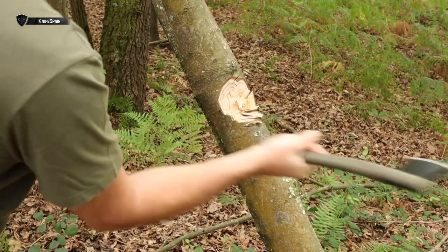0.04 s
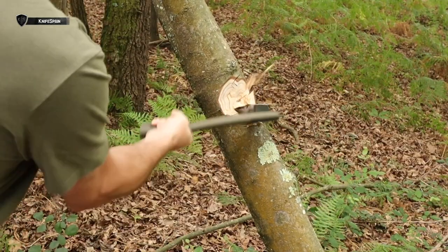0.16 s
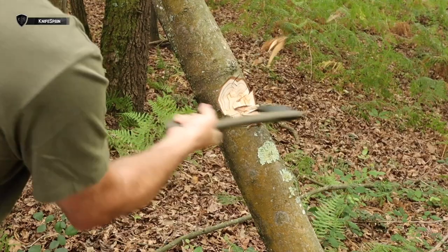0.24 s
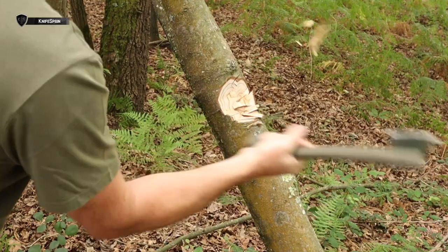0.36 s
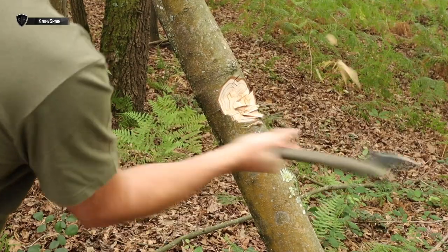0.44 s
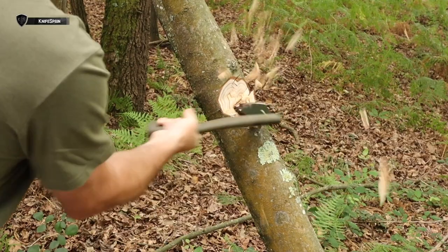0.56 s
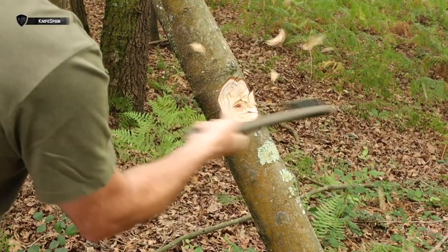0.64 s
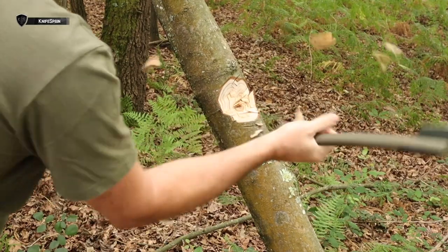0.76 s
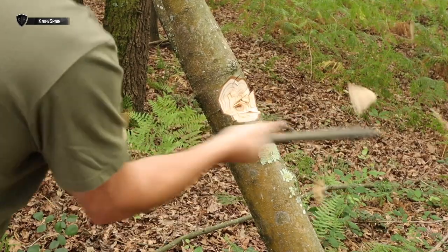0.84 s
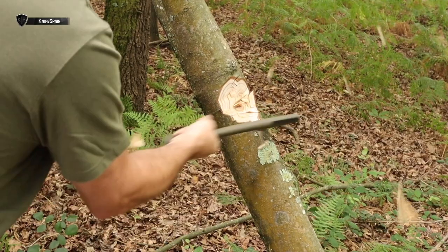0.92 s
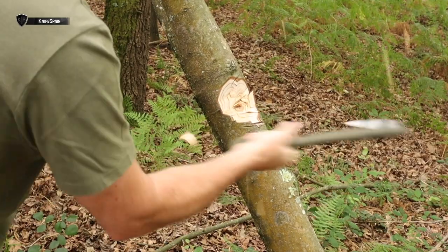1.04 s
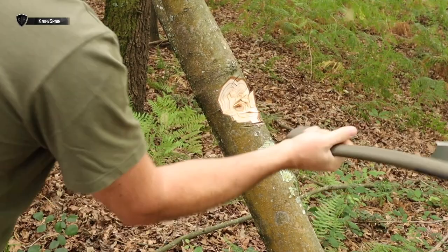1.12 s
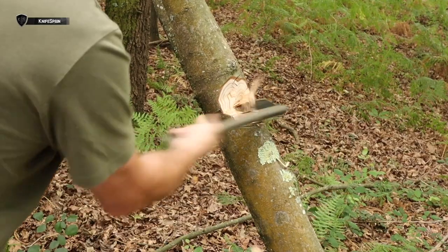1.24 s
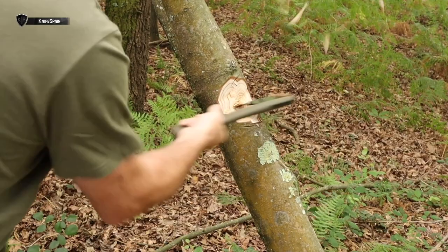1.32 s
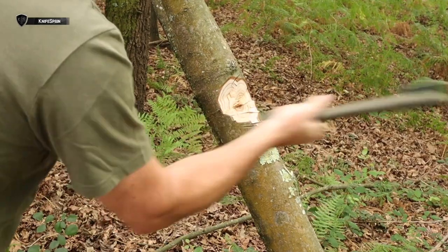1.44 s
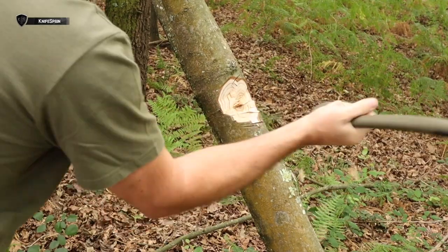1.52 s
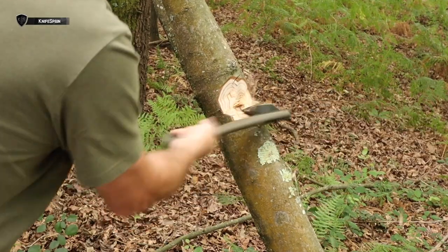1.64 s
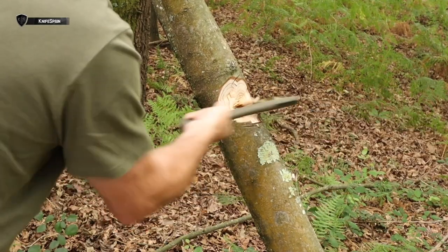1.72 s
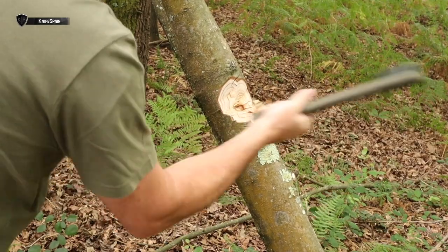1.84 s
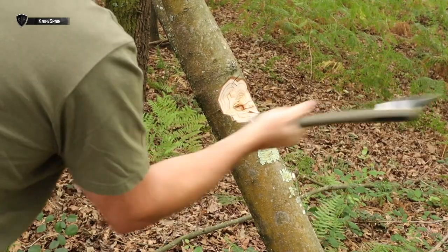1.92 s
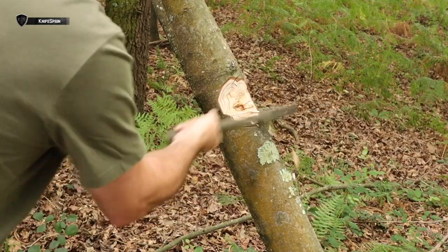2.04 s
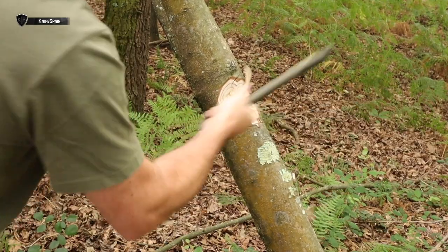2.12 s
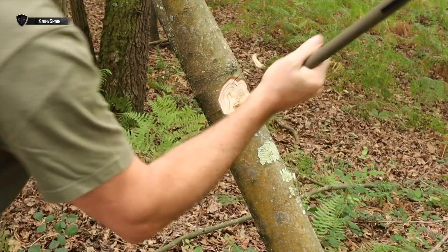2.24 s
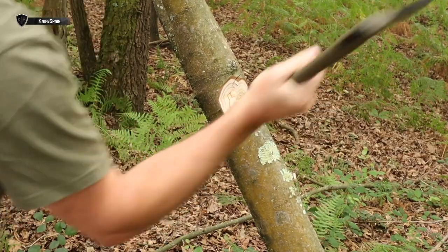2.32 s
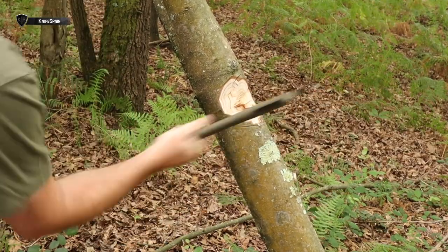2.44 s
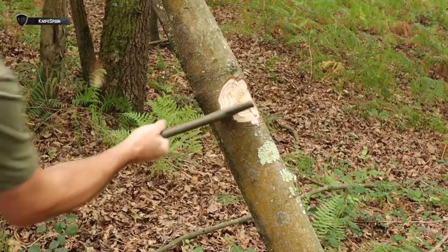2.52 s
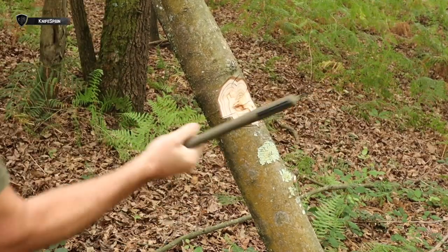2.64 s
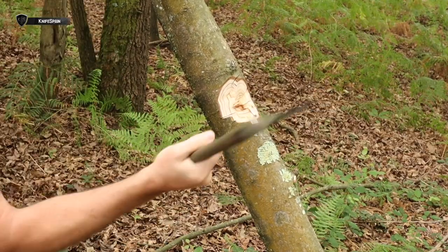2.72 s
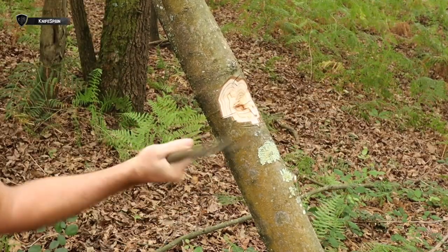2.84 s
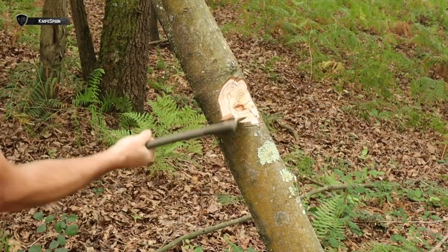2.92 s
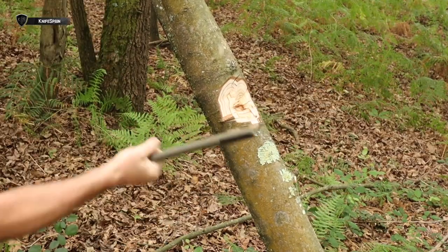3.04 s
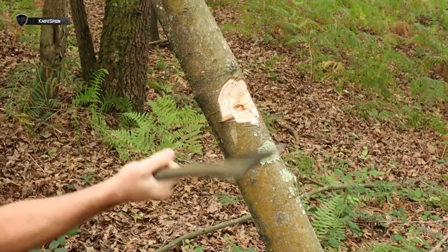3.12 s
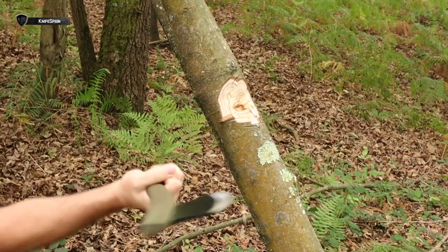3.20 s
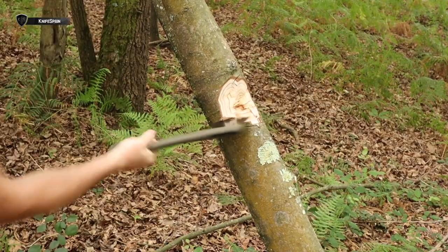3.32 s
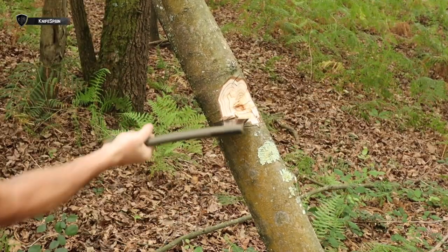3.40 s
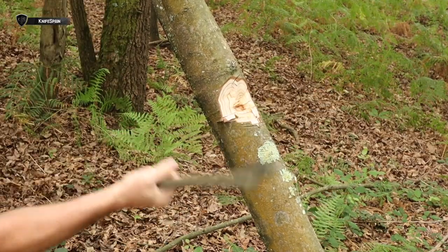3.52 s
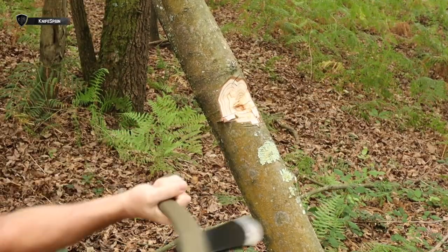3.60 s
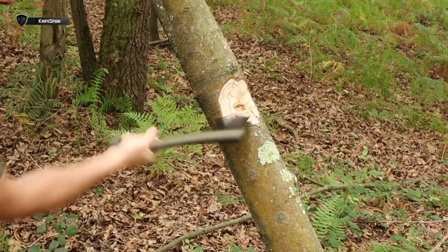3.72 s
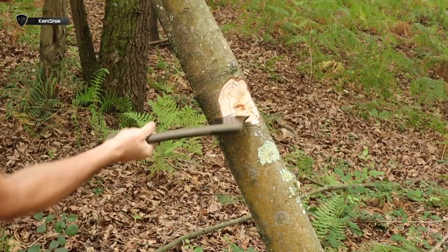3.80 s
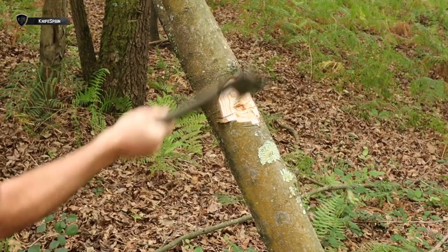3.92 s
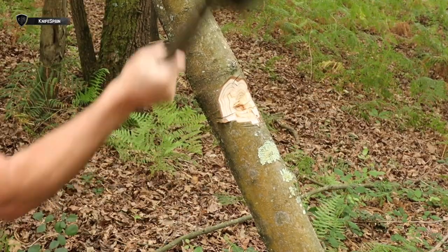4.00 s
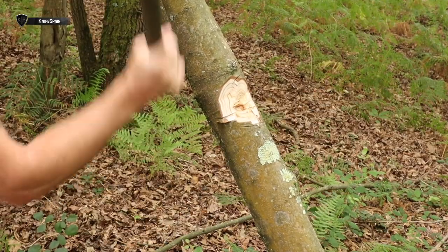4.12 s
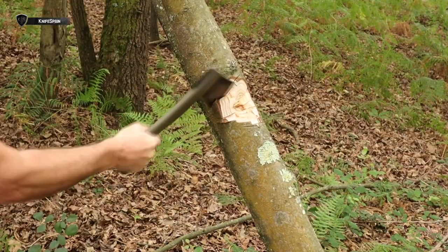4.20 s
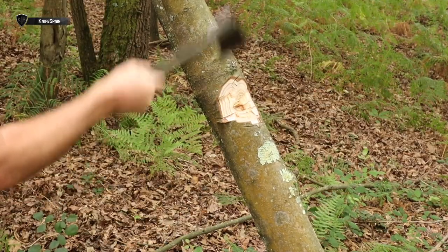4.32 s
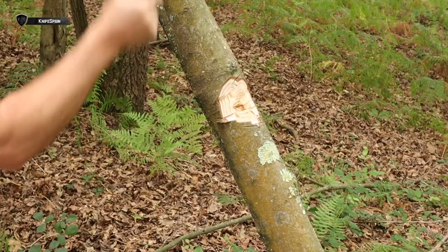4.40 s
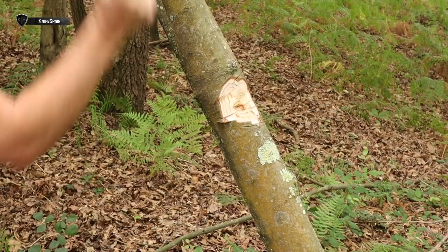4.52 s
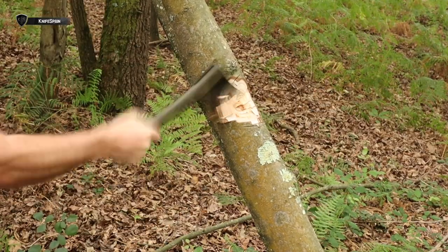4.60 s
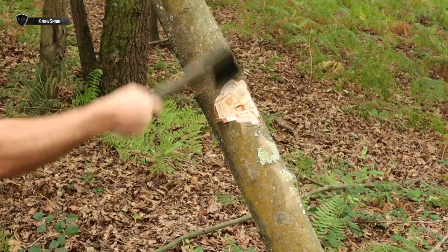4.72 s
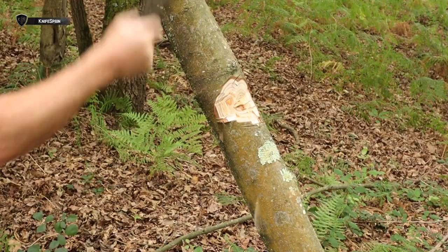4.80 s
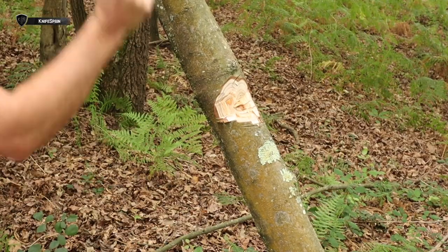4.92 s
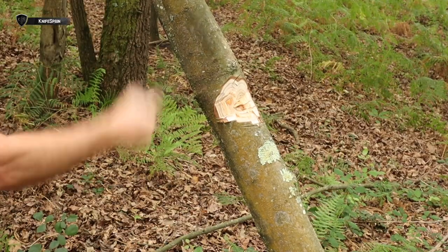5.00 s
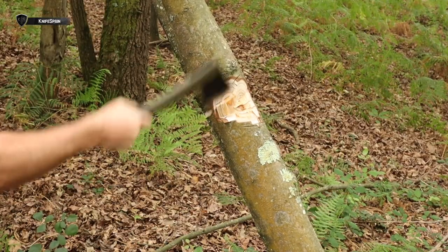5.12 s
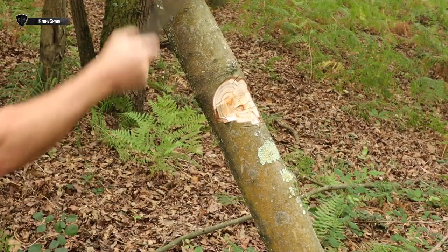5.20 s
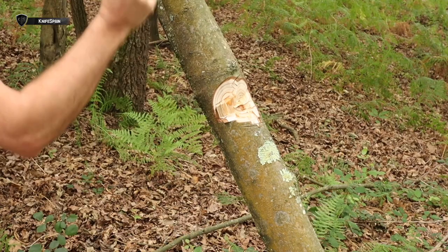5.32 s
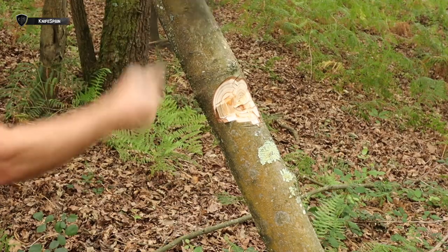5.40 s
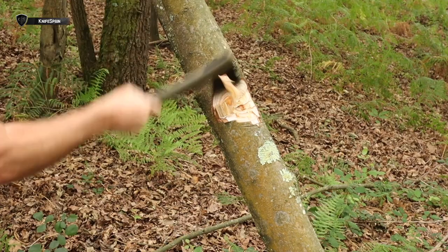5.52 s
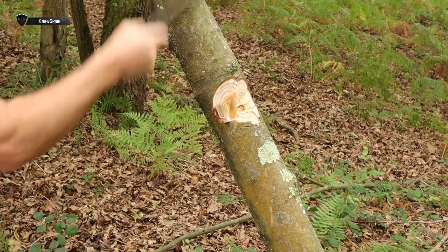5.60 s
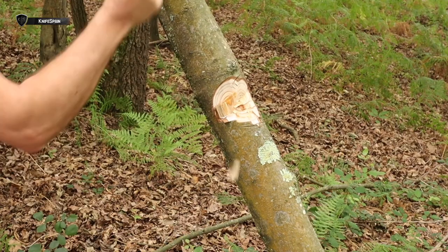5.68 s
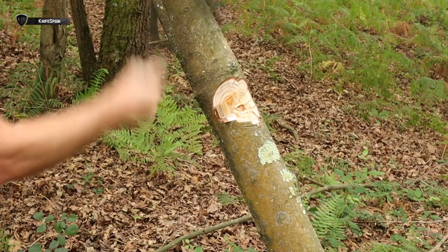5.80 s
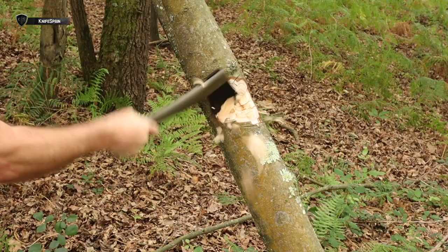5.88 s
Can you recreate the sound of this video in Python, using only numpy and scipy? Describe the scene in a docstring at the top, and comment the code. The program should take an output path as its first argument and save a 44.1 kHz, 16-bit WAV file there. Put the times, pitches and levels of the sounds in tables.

```python
"""In a quiet wood a small axe chops a notch into a young tree, about a metre from the microphone.
In each blow the blade tears fibres (bursts of noise) for a few milliseconds, then stops and knocks
the trunk into its modes (fading sine waves). The trees and the ground scatter the blows back as random
echoes, and chips drop into dry leaves as ticks and crunches of noise. Faint hoots are gliding sine waves
and the hush of the wood is shaped noise. The loudest peaks overload the recorder and are cut flat."""
import sys
import numpy as np
from scipy import signal
from scipy.fft import rfft, irfft, next_fast_len
from scipy.io import wavfile
from scipy.ndimage import uniform_filter1d

SR = 44100
rng = np.random.default_rng(int(sys.argv[2]) if len(sys.argv) > 2 else 0)


def transcribe(signal):
    """Save signal, clipped to [-1, 1], as a 16-bit WAV file at the path in sys.argv[1]."""
    frames = np.atleast_2d(signal).T
    limited = np.clip(frames, -1, 1)
    pcm = np.round(limited * 32767).astype(np.int16)
    wavfile.write(sys.argv[1], SR, pcm)


N = 262395
# time axis of one short sound (s), and the signs that turn a side signal into left and right
T = np.arange(int(.25 * SR)) / SR
SIDES = np.array([[1], [-1]])
# starting levels of the parts of a blow, for one that is level and slices a chip off (dB)
THUD_DB, KNOCK_DB, CLACK_DB, CRACK_DB, SPLINTER_DB = -34, -33, -27.5, -15.5, -16.5
# a solid blow moves the trunk more and tears less (dB gained at solidity 1)
SOLID_THUD_DB, SOLID_KNOCK_DB, SOLID_CLACK_DB, SOLID_CRACK_DB = 10, 13.5, 9.5, -9.5
# share of the splintering that a dead stop prevents (0-1)
SOLID_SMOTHER = 0.84
# a downward blow runs along the grain and hardly bends the stem (dB gained at slant 1)
SLANT_THUD_DB, SLANT_KNOCK_DB, SLANT_CLACK_DB, SLANT_SPLINTER_DB = -15, -5.5, 2, -9.5
# the stem's jerk after the blade stops (delay ms, half width ms, dB before the body's own level)
JERK_DELAY_MS, JERK_MS, JERK_DB = 0.73, 0.51, -6
# the forest answers solid blows more and downward blows less (dB)
ECHO_DB, SOLID_ECHO_DB, SLANT_ECHO_DB = 3.5, 2.5, -7
# small chips fall at random; their level varies up to the spread either way
SMALL_CHIPS_PER_S, SMALL_CHIP_DB, SMALL_CHIP_SPREAD_DB = 1.8, -61, -6
# every crunch has a pitch of its own; its burst level lies the crest below its peak level
CRUNCH_HZ, CRUNCH_SPREAD_OCTAVES, CRUNCH_CREST_DB = 3460, 0.53, 12.5
# the treble ends here
TOP_HZ = 15600


def undb(db):
    """Decibels to gain."""
    return 10 ** (np.asarray(db) / 20)


def curve(points, count):
    """Gain of a (f/Hz, level/dB) table at each frequency bin of a sound of count samples."""
    hz, db = np.transpose(points)
    bins_hz = np.fft.rfftfreq(count, 1 / SR)
    return undb(np.interp(np.log(bins_hz + 1), np.log(hz), db))


def colour(x, points):
    """Filter a sound to the given spectrum, without any sound ahead of its cause."""
    size = 8192
    # folding the cepstrum onto positive times gives the filter its minimum phase
    cepstrum = irfft(np.log(curve(points, size)))
    cepstrum[1:size // 2] *= 2
    cepstrum[size // 2 + 1:] = 0
    response = irfft(np.exp(rfft(cepstrum)))[:size // 2]
    return signal.fftconvolve(x, np.array(response, ndmin=x.ndim), axes=-1)[..., :x.shape[-1]]


def resonate(x, hz, width_hz):
    """Let through a narrow band, with gain 1 at its centre."""
    return signal.lfilter(*signal.iirpeak(min(hz, SR / 3), hz / width_hz, SR), x)


def fade(t, t60):
    """Exponential decay from t = 0 that falls by 60 dB in t60 seconds."""
    return (t >= 0) * np.exp(-np.log(1000) * np.maximum(t, 0) / t60)


def burst(x, db):
    """Give a short sound its level, its energy counted over 30 ms."""
    energy = np.sum(np.atleast_2d(x) ** 2, axis=1).mean()
    return x * undb(db) / np.sqrt(energy / (.03 * SR))


def add(out, s, x):
    """Mix a sound in at time s."""
    i = int(s * SR)
    out[:, i:i + x.shape[-1]] += x[..., :N - i]


def walk(rate):
    """Slow random wander, made of smoothed random steps at the given rate per second."""
    k = int(SR / rate)
    return uniform_filter1d(np.repeat(rng.standard_normal(N // k + 1), k), k)[:N]


def all_round(mid, side):
    """Left and right of a sound from all round: the bass is shared, the treble is wide."""
    # side signal against mid signal: f/Hz, level/dB
    width = [(60, -18.5), (300, -11), (640, -7.5), (1400, -1), (3100, 3), (7000, 7), (15000, 15.5)]
    return mid + SIDES * colour(side, width)


def crackle(count, grain_db, clump_db):
    """Dry-leaf grains of very uneven size that come in clumps, as mid and side."""
    # spectrum of dry leaves and crumbs of bark: f/Hz, level/dB (per Hz)
    leaf_spectrum = [(400, -6.5), (1200, -3.5), (3000, 2), (7000, -5), (11500, -2), (13000, -17),
                     (16000, -38)]
    clumps = uniform_filter1d(np.repeat(rng.standard_normal(count // 256 + 1), 256), 256)[:count]
    sizes = undb(grain_db * rng.standard_normal(count) + clump_db * clumps)
    grains = colour(rng.standard_normal((2, count)) * sizes, leaf_spectrum)
    return grains / grains.std()


def air(hush_db=-57.0, rustle_db=-70):
    """Steady hush of the wood with a low rumble, and dry leaves that rustle in spells."""
    # spectrum of the hush: f/Hz, level/dB (per Hz)
    hush_spectrum = [(15, -30), (25, 0.5), (70, 4), (157, -7), (373, -3.5), (545, -5.5), (624, -1),
                     (695, -4.5), (1130, -5.5), (1560, -11.5), (2000, -15.5), (2910, -18.5), (7510, -24),
                     (11600, -48), (16000, -66)]
    hush = colour(rng.standard_normal((2, N)), hush_spectrum)
    sway, spells = undb(.7 * walk(4)), undb(4 * walk(9))
    leaves = crackle(N, grain_db=7, clump_db=5)
    hush = undb(hush_db) * sway * hush / hush[0].std()
    return all_round(*(hush + undb(rustle_db) * spells * leaves))


def hoots():
    """A soft tone that swells, fades and slides in pitch with a slight waver."""
    # faint gliding hoots: t/s, length/s, level/dB, start f/Hz, end f/Hz
    hoot_list = [(2.588, 0.12, -57, 580, 650), (3.305, 0.13, -52, 565, 679),
                 (3.422, 0.078, -62.5, 615, 645), (3.573, 0.044, -57.5, 650, 618),
                 (4.708, 0.093, -56, 597, 690), (5.389, 0.1, -54.5, 545, 685),
                 (5.54, 0.032, -56.5, 640, 570)]
    out = np.zeros((2, N))
    for s, length, db, from_hz, to_hz in hoot_list:
        u = np.linspace(0, 1, int(length * SR))
        hz = from_hz + (to_hz - from_hz) * u + 4 * walk(90)[:len(u)]
        tone = np.sin(2 * np.pi * np.cumsum(hz) / SR)
        add(out, s, undb(db) * np.sqrt(2) * np.sin(np.pi * u) * tone)
    return out


def echoes(swell_s, t60, db, grain_db, clump_db=0):
    """One second of random reflections that come in clusters, swell in and die away, as mid and side."""
    t = np.arange(SR) / SR
    clusters = np.interp(t, np.linspace(0, 1, 120), rng.standard_normal(120))
    sizes = undb(grain_db * rng.standard_normal(SR) + clump_db * clusters)
    swell = 1 - np.exp(-(t / swell_s) ** 2)
    h = rng.standard_normal((2, SR)) * sizes * fade(t, t60) * swell
    return undb(db) * h / np.sqrt(np.sum(h ** 2) / 2)


def broad_colour(x, span=1.2):
    """Spectrum of a sound, each bin averaged with its neighbours within a ratio span."""
    power = np.mean(np.abs(rfft(x, SR)) ** 2, axis=0)
    hz, total = np.arange(len(power)) + 1., np.cumsum(power)
    ratio = max(span, 1.05)
    # a running total gives the power between two frequencies by subtraction
    band = np.interp(hz * ratio, hz, total) - np.interp(hz / ratio, hz, total)
    return np.sqrt(band.clip(0) / (hz * ratio - hz / ratio))


def forest(x, note_db, note_hz=620):
    """Trunks near and far return the blow, each from another angle: its rings survive only as colour."""
    # spectrum returned by the nearer trees: f/Hz, level/dB (per Hz)
    scatter_spectrum = [(50, -14.5), (130, -15), (280, -6.5), (620, -6), (1200, -2), (2000, -4.5),
                        (3200, -7.5), (4100, -3), (4900, -4), (6400, -2), (11500, -11), (13000, -21),
                        (16000, -44)]
    trees = echoes(swell_s=0.026, t60=0.34, db=-24.5, grain_db=4.0, clump_db=3.0)
    trees = colour(trees, scatter_spectrum)
    beyond = echoes(swell_s=0.59, t60=0.41, db=-33.0, grain_db=3, clump_db=2.0)
    beyond = colour(beyond, [(100, -4.0), (400, -11.0), (1200, -3.0), (3000, -8.0), (11000, -5.5),
                             (13000, -31.5), (16000, -40.5)])
    # the blade's ring comes back from the trunks
    trees = trees + 1.3 * resonate(trees, 3170, 240)
    beyond = beyond + 0.13 * resonate(beyond, 6900, 330)
    # the trunk's strongest note lingers longest between the trees
    beyond = beyond + undb(note_db) * resonate(beyond, note_hz, 55)
    # the nearest trunk answers a few milliseconds after the blow
    response = np.roll(trees + beyond, int(0.0031 * SR), axis=1)
    return all_round(*irfft(rfft(response) * broad_colour(x), SR))


def ground(x, delay_s=.0185, bounce_db=-22):
    """The leafy ground throws back one dull reflection and a brief scatter."""
    response = echoes(swell_s=0.014, t60=0.043, db=-16.0, grain_db=8.0)
    response[0, int(delay_s * SR)] += undb(bounce_db)
    response = colour(response, [(90, 4.0), (180, -2.5), (1300, 2), (2200, -12.0), (9000, -8.5),
                                 (12000, -10.0), (15000, -25.5)])
    return signal.fftconvolve(x.mean(axis=0)[None], all_round(*response), axes=1)[:, :N]


def crumbs(db=-56, swell_s=0.025, t60=0.78):
    """Crumbs of bark spray off with each blow and patter into the leaves."""
    t = np.arange(SR) / SR
    patter = crackle(SR, grain_db=5, clump_db=3)
    return all_round(*(undb(db) * patter * fade(t, t60) * (1 - np.exp(-t / swell_s))))


def leaf_crunch(db, t60=0.078, tick_s=0.0012, tick_db=2, clump_db=3):
    """A chip lands, or the swing stirs the leaves, with a tick and a short, uneven crunch of dry leaves."""
    hz = CRUNCH_HZ * 2 ** (CRUNCH_SPREAD_OCTAVES * rng.standard_normal())
    tick = undb(tick_db) * np.exp(-(T / tick_s - 1) ** 2 * 2)
    clumps = walk(200)[:len(T)]
    sizes = undb(7 * rng.standard_normal(len(T)) + clump_db * clumps)
    grains = rng.standard_normal((2, len(T))) * sizes
    crunch = grains * (tick + fade(T, t60) * (1 - np.exp(-T / tick_s)))
    crunch = crunch + 4.1 * resonate(crunch, hz, 1700)
    crunch = colour(crunch, [(200, -6.0), (900, 5.5), (3000, -2.0), (11000, 3.0),
                             (13500, -7.0), (16000, -39.5)])
    return burst(crunch[0] + SIDES * crunch[1], db - CRUNCH_CREST_DB)


def chips():
    """Larger chips drop into the leaves at set times, the leaves rustle as the axe swings in just before some
    blows, and small chips fall at random moments."""
    # the larger chips, and rustles as the axe swings in just before some blows: t/s, peak level/dB, crunch
    # t60/s
    crunch_list = [(0.042, -41.5, 0.035), (0.915, -37, .11), (1.049, -30.5, .06), (1.1837, -30, .07),
                   (1.223, -44.5, 0.03), (1.2518, -39, .05), (1.608, -44.5, .03), (1.625, -36.5, 0.065),
                   (1.6805, -47, .04), (1.805, -31, 0.097), (2.4232, -35.5, 0.17), (2.4366, -41.5, .04),
                   (2.718, -43.5, .04), (2.793, -36.5, 0.14), (2.841, -31, .07), (3.9954, -50, .04),
                   (4.027, -41.5, .04), (4.638, -35, .11), (4.7776, -40, .03), (5.003, -47.5, .03),
                   (5.034, -46.5, .05), (5.054, -43.5, .09), (5.187, -39, .1), (5.2864, -44.5, .1),
                   (5.3172, -42.5, .04), (5.327, -46.5, .03), (5.411, -36, .09), (5.438, -38, .08),
                   (5.454, -34, .07), (5.636, -40.5, .08)]
    out = np.zeros((2, N))
    for s, db, t60 in crunch_list:
        add(out, s, leaf_crunch(db, t60))
    for when, size in rng.random((int(SMALL_CHIPS_PER_S * N / SR), 2)):
        add(out, when * N / SR, leaf_crunch(SMALL_CHIP_DB + SMALL_CHIP_SPREAD_DB * (2 * size - 1)))
    return out


def shudder(slant, weight_db, db=-43.5, slant_db=-10, swell_s=0.019, t60=.22):
    """The rooted stem shakes on for a moment with a low, pitchless rumble."""
    shake = colour(rng.standard_normal(len(T)), [(25, -11.5), (60, 3), (120, 1.0), (190, -4),
                                                 (270, -15.5), (500, -27), (1500, -51)])
    shake = shake * (1 - np.exp(-T / swell_s)) * fade(T, t60)
    return burst(shake, db + slant_db * slant + weight_db)


def tearing(bite_ms, grain_db=2.5, tail_db=-13, tail_t60=0.026, side_db=-10, bite_shape=0.7):
    """Fibres snap densely while the blade sinks in, then thin out as the chip splits off."""
    bite_s = bite_ms / 1000
    depth = np.minimum(T / bite_s, 1)
    sinking = np.sin(np.pi * depth).clip(0) ** bite_shape
    splitting = undb(tail_db) * depth * fade(np.maximum(T - bite_s, 0), tail_t60)
    snaps = rng.standard_normal((2, len(T))) * undb(grain_db * rng.standard_normal(len(T)))
    mid, side = snaps * (sinking + splitting)
    return mid + undb(side_db) * SIDES * side


def trunk(t, low_hz, high_hz, detune=0.0068, scatter_db=3.0, push_s=0.0008, side_share=0.08,
          contact_s=0.0072, free_db=-4, dense_db=-10, dense_t60=.035):
    """The trunk's modes in one register: driven hard while the blade pushes, then ringing freely."""
    # modes of the trunk: f/Hz, level/dB, t60/s
    mode_table = [(123.6, -5.5, 0.22), (173, 6, 0.1), (231, 1, 0.1), (244, -6.5, 0.11), (328, -7, 0.048),
                  (384.4, 6.5, 0.05), (417.4, -4, 0.027), (492, -10.5, 0.13), (552, -4, 0.058),
                  (608, 13, 0.031), (700, 5.5, 0.035), (749, -6.5, 0.11), (856.3, 3, 0.035),
                  (927.6, 0.5, 0.077), (962.3, 1.5, 0.064), (1108, -4, 0.04), (1182, -9, 0.069),
                  (1273, 1.5, 0.029), (1347, -7, 0.016), (1519.5, -4.5, 0.085), (1572, 0.5, 0.027),
                  (1834, -3, 0.022)]
    chosen = np.array([m for m in mode_table if low_hz <= m[0] < high_hz])
    hz, db, t60 = chosen.T[:, :, None]
    # each blow shifts every mode a little in pitch, level and direction
    tune, size, lean = rng.standard_normal((3, len(hz), 1))
    t = np.maximum(t, 0)
    contact = np.exp(-(t / contact_s) ** 4)
    drive = (1 - np.exp(-t / push_s)) * (undb(free_db) + (1 - undb(free_db)) * contact)
    # the added half turns make neighbouring modes start with opposite signs
    phase = 2 * np.pi * hz * (1 + detune * tune) * t + np.pi * np.arange(len(hz))[:, None]
    swing = undb(db + scatter_db * size) * fade(t, t60) * drive
    side = side_share * np.sqrt(hz / 500) * lean * np.sin(phase)
    modes = np.sum(swing * np.cos(phase), axis=0) + SIDES * np.sum(swing * side, axis=0)
    # many weak, quickly damped modes fill the gaps between the strong ones: here, filtered noise
    register = signal.butter(2, [hz.min(), hz.max()], "bandpass", fs=SR, output="sos")
    dense = signal.sosfilt(register, rng.standard_normal(len(t)) * drive * fade(t, dense_t60))
    return burst(modes, 0) + burst(dense, dense_db)


def blow(bite_ms, stop_ms, solid, slant, chip_hz, blade_hz, blade_db, upper_hz, upper_db, splinter_hz,
         weight_db, body_db, hollow_db, hard_db, snap_db):
    """Tearing fibres ring the wedged blade; its sudden stop rings the chip and the trunk."""
    # spectra of the tearing crack and of the splinters: f/Hz, level/dB (per Hz)
    crack_spectrum = [(1200, -5), (2000, -2), (2700, 6), (4000, -7.5), (5000, -16), (7000, -17.5)]
    splinter_spectrum = [(3500, -6), (5200, 3), (7000, 1.5), (9000, -3), (11300, 4), (12800, -10),
                         (16000, -35)]
    # time since the blade stopped
    t = T - stop_ms / 1000
    thud = trunk(t, 0, 280, dense_db=-9.5)
    body = trunk(t, 280, 455, dense_db=-5)
    knock = trunk(t, 455, 815, dense_db=-4)
    clack = trunk(t, 815, 2500, dense_db=-5, dense_t60=0.031)
    # the stem jerks away and back once: a single broad thump under its modes
    u = (t - JERK_DELAY_MS / 1000) / (JERK_MS / 1000)
    body = burst(body, 0) + burst(-u * np.exp(-u ** 2 / 2), JERK_DB)
    chip = np.sin(2 * np.pi * chip_hz * t) * fade(t, 0.021)
    fibres = tearing(bite_ms)
    clack = burst(clack, 0) + burst(chip, -3) + burst(resonate(fibres, 1800, 580), -4.5)
    # the wood grips the steel, so its two rings last only milliseconds
    blade = burst(resonate(fibres, blade_hz, 260), blade_db)
    upper_blade = burst(resonate(fibres, upper_hz, 210), upper_db)
    crack = burst(colour(fibres, crack_spectrum), 0) + blade + upper_blade
    splinters = tearing(bite_ms * 0.81, tail_db=-19.0)
    splinter = burst(colour(splinters, splinter_spectrum), 0)
    splinter = splinter + burst(resonate(splinters, splinter_hz, 700), -7.5)
    # the whole stem gives way in one slow shove
    shove = np.sin(2 * np.pi * 55 * t) * fade(t, 0.012)
    # solidity and slant share the blow between the trunk and the fibres
    thud_db = THUD_DB + SOLID_THUD_DB * solid + SLANT_THUD_DB * slant
    knock_db = KNOCK_DB + SOLID_KNOCK_DB * solid + SLANT_KNOCK_DB * slant + hollow_db
    clack_db = CLACK_DB + SOLID_CLACK_DB * solid + SLANT_CLACK_DB * slant + hard_db
    crack_db = CRACK_DB + SOLID_CRACK_DB * solid
    splinter_db = SPLINTER_DB + SLANT_SPLINTER_DB * slant + snap_db
    bass = burst(thud, weight_db - 2.5) + burst(shove, weight_db - 24.5) + burst(body, body_db - 2.0)
    wood = undb(thud_db) * bass + burst(knock, knock_db) + burst(clack, clack_db)
    splinter = max(1 - SOLID_SMOTHER * solid, 0) * burst(splinter, splinter_db)
    # the fibres are too small to radiate bass
    torn = colour(burst(crack, crack_db) + splinter, [(80, -14.0), (500, 0.5)])
    return wood + shudder(slant, weight_db) + torn


def scene():
    """Blows and chips, their echoes and the quiet wood."""
    # blows: t/s, strength level/dB, bite length/ms, time until the blade stops/ms,
    # solidity (0 slices a chip off - 1 stops dead in the wood), slant (0 level - 1 steeply down),
    # chip f/Hz, blade ring f/Hz, its level/dB, upper blade ring f/Hz, its level/dB, splinter f/Hz,
    # extra level/dB of thud, body, knock, clack, splinters and echo, lingering trunk note level/dB
    blow_list = [(0.206, -5, 2.8, 1.83, 0.012, 0.11, 1230, 2354, -16.5, 3504, -9, 5175, 7, 7.5, 2, 2.5, 2.5, 1, -9.5),
                 (0.574, -7, 4.2, 0.38, 0.65, 0.01, 1130, 2680, -18, 5100, -4.5, 10500, 1, -9, 4, 1, 2, 0, 3),
                 (0.5771, -7.5, 7.5, 1.83, 0.57, 0.01, 1040, 2670, 10.5, 5430, 2, 10500, 2, 3, -2, 1, 3, 0, 16),
                 (0.9504, 3.5, 2.5, 1.54, 0.53, 0.022, 1086, 2380, -2.5, 3040, -10, 6300, -0.5, -3.5, -1.5, -3.5, -4.5, 0, 14),
                 (1.313, 0.5, 1.3, 1.62, 0.17, 0.06, 1187, 2640, -1, 3120, -7.5, 5300, -2, 5, 4, 1.5, -3, 0, 22.5),
                 (1.708, -1.5, 2.9, 2.3, 0.33, 0.033, 1207, 2880, 1, 2200, -1, 6300, 1.5, 4, 0.5, 0, -2, 1, 7.5),
                 (2.0666, -1.5, 1.7, 1.44, 0.15, 0.015, 1050, 2847, 6, 3636, -1.5, 6200, 3.5, -1.5, 2.5, 1.5, 0.5, -1, 7),
                 (2.5399, 0, 4.5, 1.63, 0.76, 0.044, 1280, 2730, 26, 3360, -36.5, 10500, -1.5, 4, 4, 1, 1, 0, 8),
                 (2.964, 0.6, 2.7, 1.26, 0.27, 0.18, 940, 2894, -7.5, 3780, -1, 6500, 1.5, -0.5, 0, -2, 0, 0, 2.5),
                 (3.391, -2, 2.1, 1.34, 1, 0.019, 1588, 2710, 16, 4000, 3, 6000, -1.5, 4, 0.5, 0.5, 0, 0, -9.5),
                 (3.792, -4.5, 6.2, 2.43, 0.73, 0.014, 1286, 2593, -1, 3930, -6.5, 7500, 3.5, 6.5, 3.5, 1.5, 0.5, 0, 5),
                 (4.2553, -0.5, 5.1, 1.4, 0.79, 0.54, 1220, 2350, 0, 2870, -14, 4600, 4, 0.5, -6, -0.5, 7.5, 0, 4),
                 (4.6688, 0.5, 5, 2.14, 0.084, 0.6, 1935, 3005, 5, 3874, -1, 6200, -8, 6, -2, -2, -5.5, 1, 11.5),
                 (5.083, -4, 6.4, 1.22, 0.24, 0.6, 1207, 2150, -9, 2750, -7, 5250, 3, 9, 5.5, 2.5, 7, 0, 4),
                 (5.4938, 1, 6.5, 0.43, 0.54, 0.76, 1415, 2200, -5.5, 3160, 6, 7000, -1.5, -5.5, 0.5, -1.5, 3, 0, 19),
                 (5.8945, -2.5, 2.95, 0.17, 0.65, 0.56, 2000, 2000, -11, 3590, -13, 6000, -3, -7, -0.5, 1.5, -6, 0, 11),
                 (5.9, -1, 3.6, 1.5, 0.88, 0.49, 900, 2130, -0.5, 3450, 1, 6000, -4, -14, 0, 0, 5, 0, -4.5)]
    # single thick trunks that return the blow: delay t/s, level/dB
    big_trees = [(0.055, -34.5), (0.085, -37), (0.107, -37.5), (0.168, -38)]
    axe, far = np.zeros((2, 2, N))
    for s, db, bite_ms, stop_ms, solid, slant, *timbre, carry_db, note_db in blow_list:
        sound = undb(db) * blow(bite_ms, stop_ms, solid, slant, *timbre)
        echo_db = ECHO_DB + SOLID_ECHO_DB * solid + SLANT_ECHO_DB * slant + carry_db
        add(axe, s, sound)
        add(far, s, undb(echo_db) * (forest(sound, note_db) + crumbs()))
    # rough bark returns little treble
    dull = colour(axe, [(200, -7), (700, 0), (1500, -1.5), (3000, -15.5), (9000, -13.5)])
    for delay_s, db in big_trees:
        add(far, delay_s, undb(db) * dull)
    background = hoots() + air()
    near = axe + chips()
    return near + ground(near) + far + background


def record(dry):
    """The two microphone ports differ in colour and phase; peaks are cut flat, then the top is cut."""
    # left minus right port: f/Hz, level/dB
    port_levels = [(200, -0.2), (1200, 0.5), (1950, -0.5), (2150, 0.5), (2800, -1), (3100, -0.5),
                   (5000, 1.2), (9000, 0), (13000, 0)]
    # how far the left port leads in phase: f/Hz, lead/radians
    port_phase = [(500, -0.14), (1900, -0.53), (2400, 0.15), (2900, -0.094), (4700, 1), (6000, -0.1),
                  (8000, 0.49), (9500, -0.4)]
    size = 2 * next_fast_len(N // 2 + 1)
    lead = np.interp(np.fft.rfftfreq(size, 1 / SR), *np.transpose(port_phase))
    # each port takes half of the difference
    ports = curve(port_levels, size) ** (SIDES / 2) * np.exp(1j * lead * SIDES / 2)
    ported = irfft(rfft(dry, size) * ports, size)[:, :N]
    clipped = np.clip(ported, -.95, .95)
    top_cut = signal.ellip(8, .1, 70, TOP_HZ, fs=SR, output="sos")
    return signal.sosfilt(top_cut, clipped)


dry = scene()
out = record(dry)
transcribe(out)
```